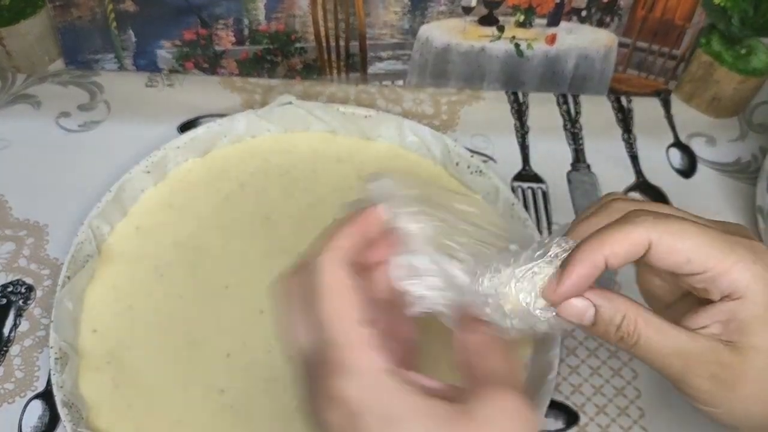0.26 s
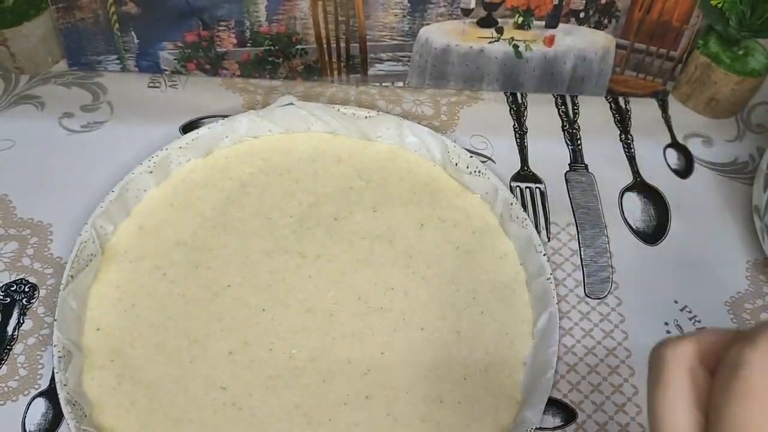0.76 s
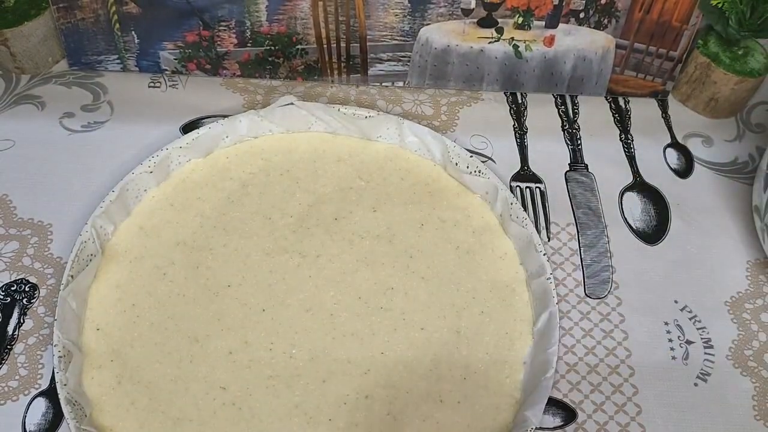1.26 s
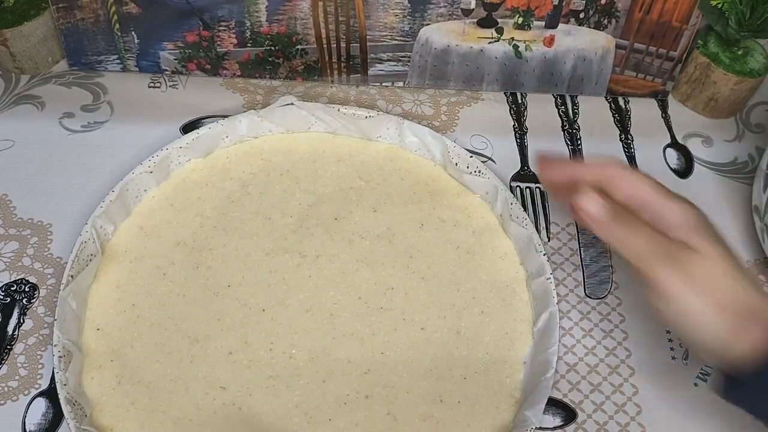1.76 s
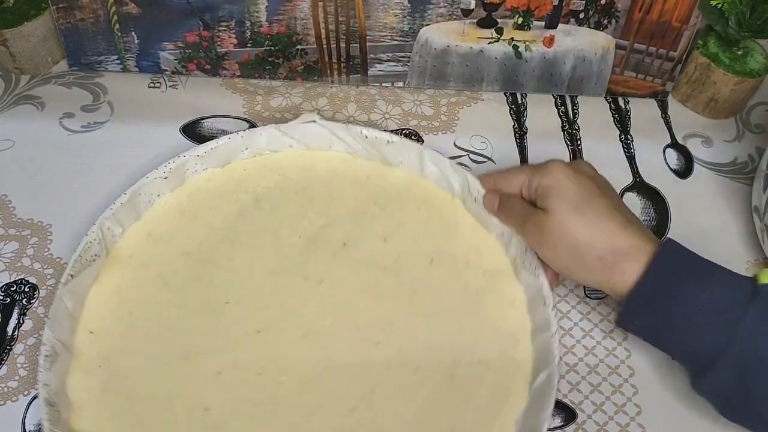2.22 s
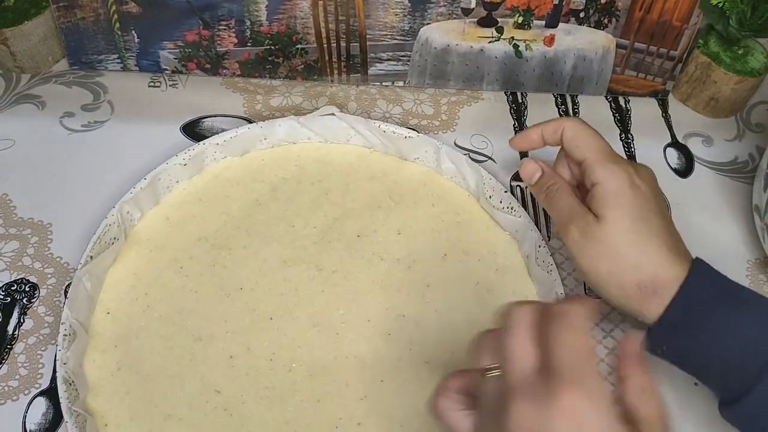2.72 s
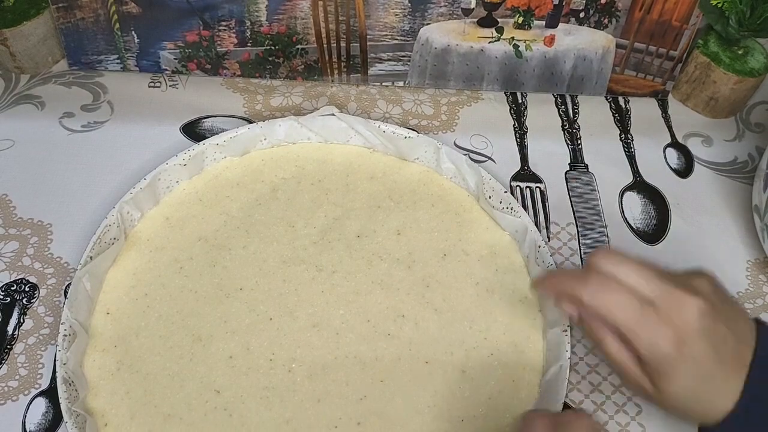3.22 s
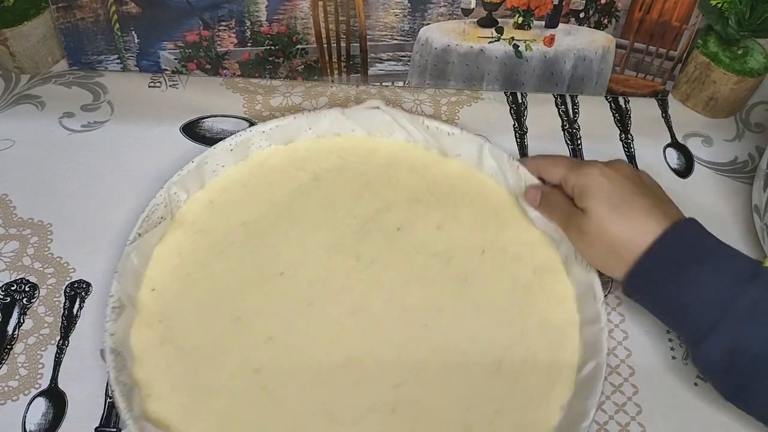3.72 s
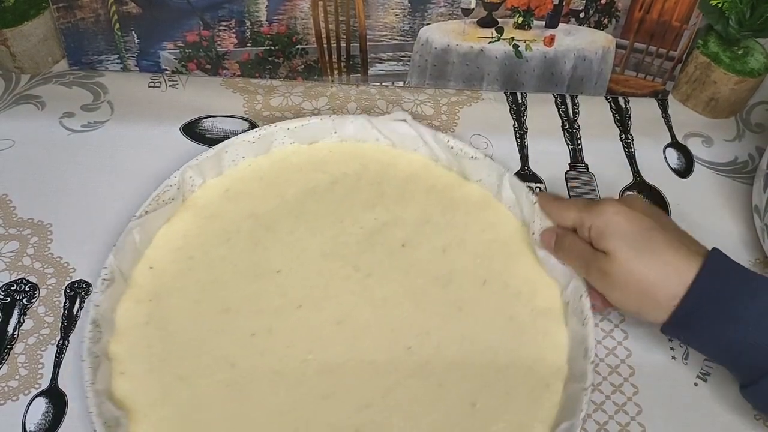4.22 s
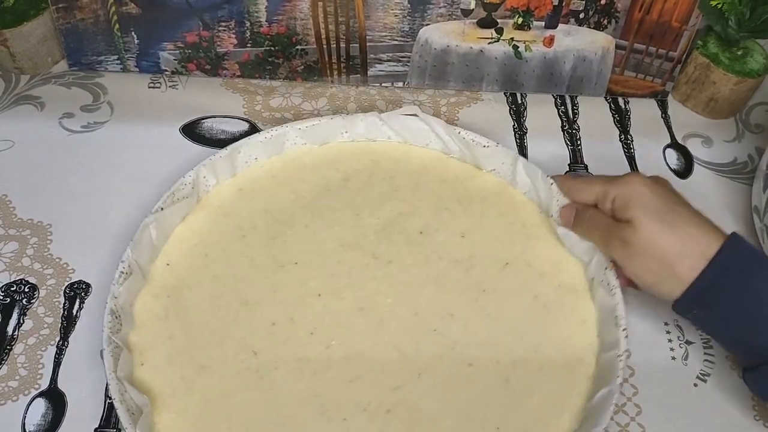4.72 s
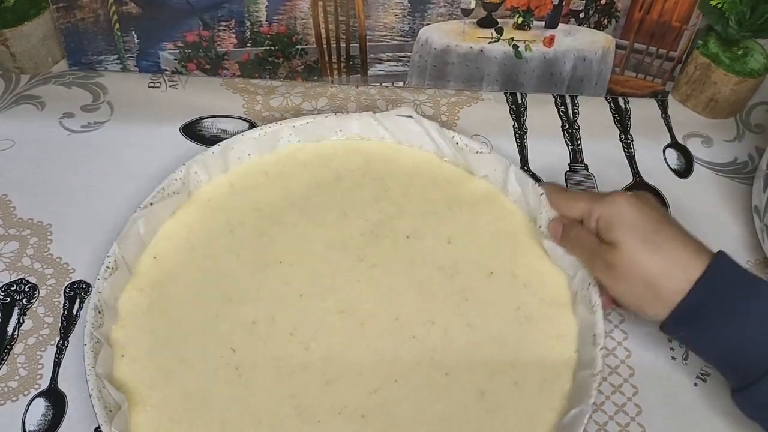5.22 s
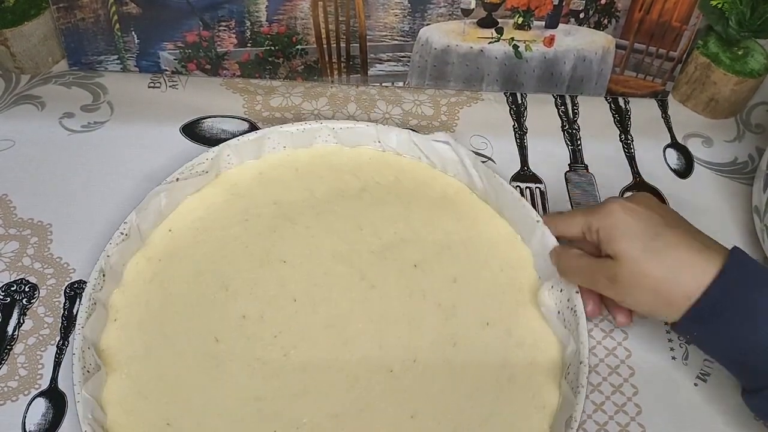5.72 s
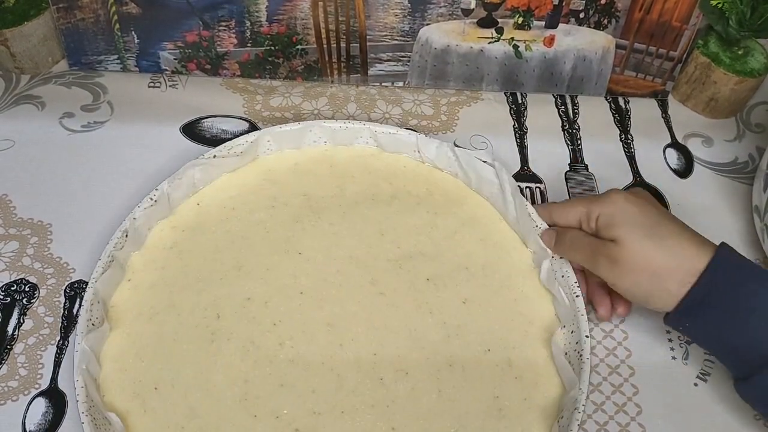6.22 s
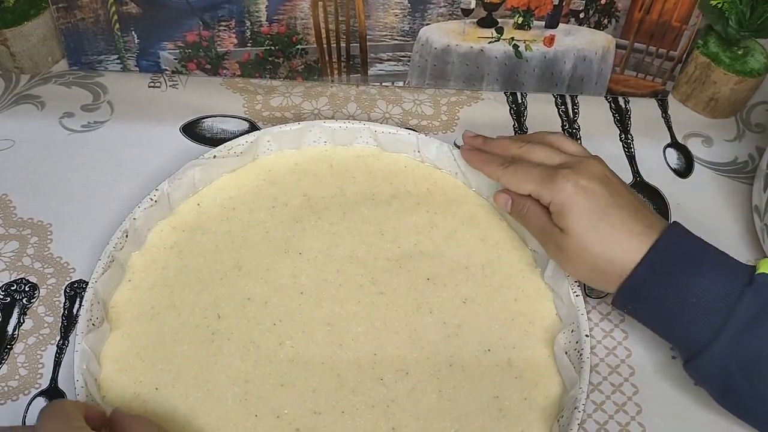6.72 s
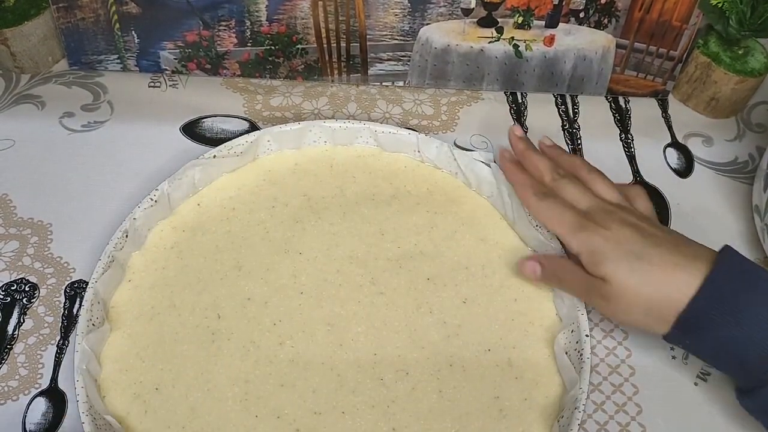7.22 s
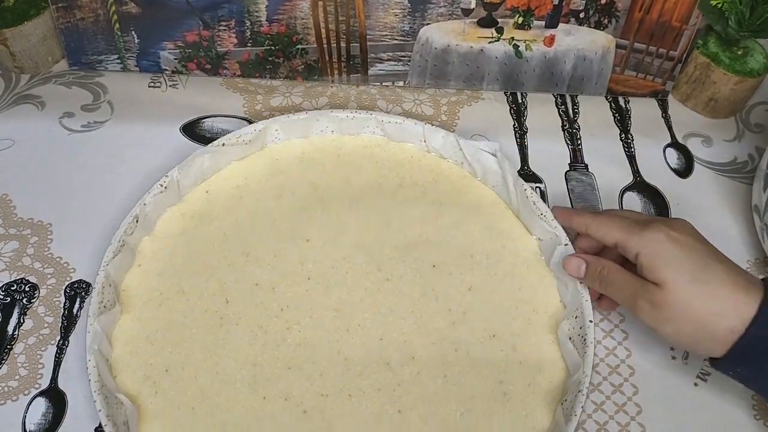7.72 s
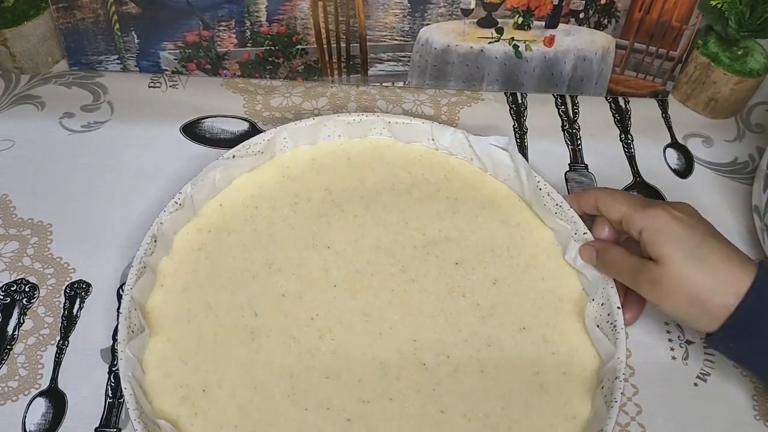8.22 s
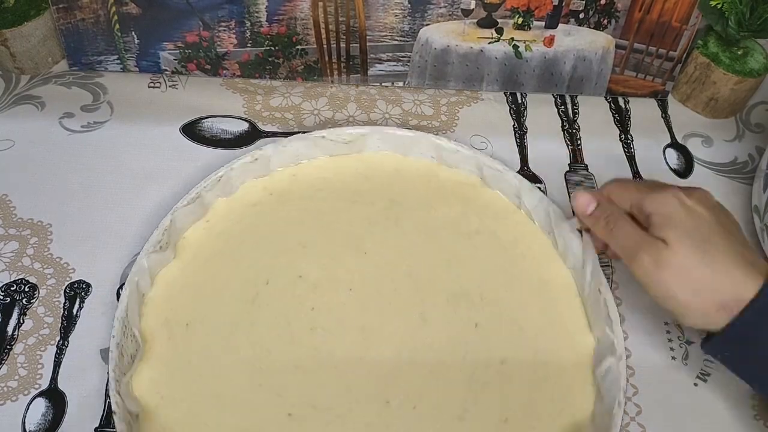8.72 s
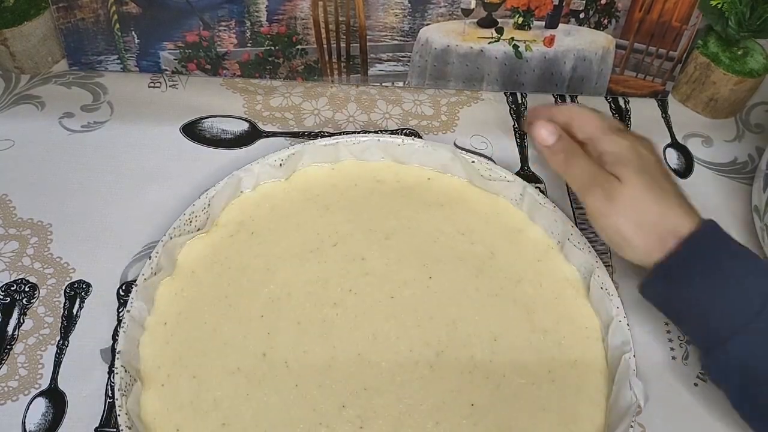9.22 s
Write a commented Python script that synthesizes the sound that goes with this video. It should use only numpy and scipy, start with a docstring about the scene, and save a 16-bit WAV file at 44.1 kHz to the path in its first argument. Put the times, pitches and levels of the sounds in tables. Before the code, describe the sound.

Close stereo in a small, slightly live kitchen with a faint low appliance hum. A thin plastic glove crackles densely for half a second, thins out and stops. Then fingers rub stiff parchment, and a dough-filled metal tray shifts softly over the tablecloth, with sharp paper snaps and several short, damped knocks, strongest around the middle.

```python
"""A small kitchen, heard close over a covered table with a stereo pair; an appliance hums in the room.
A thin plastic glove is pulled off and crumpled: its film is dense filtered clicks, pops and cracks.
Then a round metal tray, lined with parchment and damped by dough, is turned by hand: clicks and struck modes
make its knocks on the table, filtered clicks its soft slide, and the paper rustles and snaps above it."""
import sys
import numpy as np
from scipy import signal
from scipy.fft import rfft, irfft
from scipy.io import wavfile

SR = 44100
rng = np.random.default_rng(int(sys.argv[2]) if len(sys.argv) > 2 else 0)


def waveform_to_disk(signal):
    """Save audio, clipped to [-1, 1], as 16-bit WAV at the path in sys.argv[1]."""
    frames = np.transpose(np.atleast_2d(signal))
    scaled = np.clip(frames, -1, 1) * 32767
    samples = np.round(scaled).astype(np.int16)
    wavfile.write(sys.argv[1], SR, samples)


N = 417186
TIME = np.arange(N) / SR


def from_db(db):
    """Decibels to gain."""
    return 10 ** (np.asarray(db) / 20)


def rms_one(x):
    """Scale to unit power."""
    return x / np.sqrt(np.mean(x ** 2) + 1e-20)


def at_level(x, db, span_s):
    """Give the start of a sound this rms level."""
    start = x[:round(span_s * SR)]
    return from_db(db) * x / np.sqrt(np.mean(start ** 2))


def level(curve):
    """Gain over time from (t/s, level/dB) rows, -120 dB outside them."""
    return from_db(np.interp(TIME, *np.transpose(curve), left=-120, right=-120))


def at_hz(points, hz):
    """Read a table on a log-frequency axis."""
    f, value = np.transpose(points)
    return np.interp(np.log(np.maximum(hz, 1)), np.log(f), value)


def butter(x, hz, kind, order=2):
    """Causal Butterworth filter."""
    sections = signal.butter(order, np.minimum(hz, SR / 2 - 1), kind, fs=SR, output="sos")
    return signal.sosfilt(sections, x)


def coloured(x, spectrum, size=2048):
    """Filter by the causal, unit-energy response with this spectral shape (minimum phase, by cepstrum)."""
    gain = from_db(at_hz(spectrum, np.fft.rfftfreq(size, 1 / SR)))
    cepstrum = irfft(np.log(gain))
    cepstrum[1:size // 2] *= 2
    cepstrum[size // 2 + 1:] = 0
    response = irfft(np.exp(rfft(cepstrum)))
    response /= np.linalg.norm(response)
    return np.apply_along_axis(lambda row: signal.oaconvolve(row, response)[:len(row)], -1, x)


def drift(rate):
    """Slow chance with an rms of one; rate is in random knots per second."""
    knots = rng.standard_normal(4096)
    return rms_one(np.interp(TIME * rate, np.arange(len(knots)), knots))


def add(track, s, sound):
    """Mix a sound in at a time."""
    start = max(round(s * SR), 0)
    track[..., start:start + sound.shape[-1]] += sound[..., :N - start]


def spread(x, left_db):
    """Place a sound between left and right."""
    return x * from_db([[left_db / 2], [-left_db / 2]])


# decay of the room: f/Hz, t60/s
ROOM_DECAY = [(100, 0.46), (500, 0.23), (1000, 0.39), (2200, 0.17), (4000, 0.13), (8000, 0.089),
              (16000, 0.14)]
ROOM_ALIKE_HZ = 300  # well below this both microphones hear the same tail


def kitchen(x, wet_db, early_db, early_t60):
    """Direct sound, scatter from the sides of the table, and the room's tail, band by band."""
    t = TIME[:SR // 2]
    edges = np.geomspace(60, 20000, 10)
    response = np.zeros((2, len(t)))
    early = from_db(-60 * t / early_t60) * (t > .0005)
    early *= from_db(early_db) / np.linalg.norm(early)
    for low, high in zip(edges, edges[1:]):
        hz = np.sqrt(low * high)
        mid, side, scatter = butter(rng.standard_normal((3, len(t))), [low, high], "band")
        alike = 1 / (1 + (hz / ROOM_ALIKE_HZ) ** 2)
        tail = from_db(-60 * t / at_hz(ROOM_DECAY, hz)) * (t > .007)
        tail *= from_db(wet_db) / np.linalg.norm(tail)
        shared = np.sqrt(1 + alike) * mid * tail
        opposed = np.sqrt(1 - alike) * (side * tail + scatter * early)
        response += (shared + opposed * [[1], [-1]]) / np.sqrt(2)
    return x + signal.oaconvolve(np.atleast_2d(x), response, axes=1)[:, :N]


# low drone before its trim and waver: t/s, level/dB
DRONE_LEVEL = [(0.0, -77), (0.45, -56), (1.6, -65), (2.32, -41.5), (2.55, -57), (2.71, -47.5), (4.9, -51.5),
               (6.14, -45), (6.24, -52), (6.58, -40.5), (6.82, -50), (7.27, -53), (7.43, -47),
               (7.56, -54.5), (8.59, -52.5), (9.46, -55)]
DRONE_HZ, DRONE_TRIM_DB, DRONE_WAVER_DB = 47.2, -3, 3
# faint overtones of the drone, before their waver: f/Hz, rms level/dB
OVERTONES = [(183.0, -67), (369.5, -64), (395.0, -71.5), (500.6, -71.5), (561.5, -68)]
OVERTONE_WAVER_DB, OVERTONE_WANDER_RAD = 2.5, 1.01
# spectral shape of the still air: f/Hz, relative level/dB
AIR_SHAPE = [(20, 2), (35, -5.5), (60, -1.5), (90, -5), (165, 2), (235, -3), (290, 0), (380, -2.5),
             (520, -2), (700, -6), (1000, -13), (2000, -15), (4000, -19), (5500, -23), (8500, -42.5),
             (16000, -52)]
AIR_DB = -57.5


def background():
    """A wavering low drone with faint overtones (wandering sines), over the still air of the room (noise)."""
    drone_gain = from_db(DRONE_TRIM_DB + DRONE_WAVER_DB * drift(12)) * level(DRONE_LEVEL)
    drone = drone_gain * np.sin(2 * np.pi * DRONE_HZ * TIME + 0.32 * drift(3.6))
    hum = np.zeros(N)
    for hz, db in OVERTONES:
        gain = from_db(db + OVERTONE_WAVER_DB * drift(9))
        hum += gain * np.sin(2 * np.pi * hz * TIME + OVERTONE_WANDER_RAD * drift(10))
    mid, side = (coloured(noise, AIR_SHAPE, size=8192) for noise in rng.standard_normal((2, N)))
    air = mid + from_db(2.5) * butter(side, 470, "high", order=1) * [[1], [-1]]
    tones = drone * from_db([[-1.1], [1.1]]) + hum
    return np.sqrt(2) * tones + from_db(AIR_DB) * air  # sqrt(2): sine rms to peak


def swell(start_s, hold_s, db, rise_s, fall_s):
    """Attack, hold and release; rise and fall are the times for 20 dB."""
    before = np.maximum(start_s - TIME, 0) / max(rise_s, 1e-3)
    after = np.maximum(TIME - start_s - hold_s, 0) / max(fall_s, 1e-3)
    return from_db(db - 20 * np.minimum(before + after, 6))


def together(swells):
    """Overlapping movements add in power."""
    return np.sqrt(sum(gain ** 2 for gain in swells))


def strokes(rows):
    """Each stroke gathers up to its peak and eases off."""
    return together(swell(s, 0, db, rise_s, fall_s) for s, db, rise_s, fall_s in rows)


def crinkles(per_s, spread_db, clump_db, clump_rate):
    """Tiny buckles or slips: clicks of uneven size that come in clumps, each from its own place."""
    at = rng.integers(0, N, int(per_s * N / SR))
    knots = rng.standard_normal(4096)
    clumps = np.interp(at / SR * clump_rate, np.arange(len(knots)), knots)
    uneven = np.minimum(rng.exponential(1, len(at)), 4)
    sizes = from_db(spread_db * uneven + clump_db * clumps) * rng.choice([-1, 1], len(at))
    # each click reaches the two microphones at slightly different times
    lag = np.rint(rng.normal(0, 1.6, len(at))).astype(int)
    out = np.zeros((2, N))
    out[0, at] = sizes
    out[1, (at + lag) % N] = sizes
    return rms_one(out)


REFOLD_DB, REFOLD_PER_S = 2.5, 14  # the colour of a sheet shifts as it folds anew


def sheet(per_s, spread_db, clump_db, clump_rate, jerk_db):
    """Facets of eight sizes buckle independently, so the colour shifts; small ones sound high."""
    edges = np.array([300, 1300, 2100, 2900, 3700, 4600, 5800, 8500, 17000])
    shares = np.diff(edges) / np.ptp(edges)  # wider bands get more clicks
    facets = np.zeros((2, N))
    for low, high, share in zip(edges, edges[1:], shares):
        buckles = crinkles(per_s * share, spread_db, clump_db, clump_rate)
        facets += butter(buckles, [low, high], "band") * from_db(REFOLD_DB * drift(REFOLD_PER_S))
    # the fingers catch and let go, which jerks all facets at once
    return facets * from_db(jerk_db * drift(70))


def pops(per_s, low_hz, high_hz, cycles):
    """Larger creases pop at random, each ringing briefly (60 dB in so many cycles) at its own pitch."""
    out, t = np.zeros((2, N)), TIME[:1024]
    for when, size, pitch, side in rng.random((int(per_s * N / SR), 4)):
        hz = low_hz * (high_hz / low_hz) ** pitch
        pop = from_db(14 * size - 60 * t * hz / cycles) * np.sin(2 * np.pi * hz * t)
        add(out, when * N / SR, spread(pop, 12 * (side - .5)))
    return rms_one(out)


SQUEEZE_ATTACK_S, SQUEEZE_RELEASE_S = 0.04, 0.076  # time to rise or fall by 20 dB


def squeezing(grips):
    """The hands grip the film, keep up the pressure and let go."""
    return together(swell(s, hold_s, db, SQUEEZE_ATTACK_S, SQUEEZE_RELEASE_S) for s, hold_s, db in grips)


# spectral shape of the film: f/Hz, relative level/dB
FILM_SHAPE = [(350, -22), (600, -17.5), (957, -16.5), (1040, -13.5), (1410, -16.5), (1660, -13),
              (2950, -9.5), (3340, -9.5), (4650, -6.5), (5560, -7), (8860, -19), (14300, -18), (16000, -28)]
# pulls and squeezes, before the glove's trim: start t/s, hold/s, fine film level/dB, coarse folds level/dB
GLOVE_SQUEEZES = [(0.0, 0.056, -38, -44), (0.083, 0.042, -37.5, -56), (0.156, 0.079, -39.5, -48),
                  (0.243, 0.072, -37, -44.5), (0.342, 0.04, -38, -47), (0.412, 0.025, -45, -58),
                  (0.439, 0.01, -36, -53), (0.589, 0.027, -37, -44), (0.632, 0.077, -39.5, -63),
                  (0.831, 0.1, -48, -58), (0.973, 0.04, -48, -54), (1.203, 0.042, -52.5, -70),
                  (1.33, 0.092, -43, -49)]
STIR_HOLD_S, STIR_DB = 1.55, -61  # the film keeps stirring in the hand between squeezes
# faint squeak of the film: t/s, level/dB
SQUEAK_LEVEL = [(1.08, -84), (1.11, -60), (1.16, -56), (1.19, -78)]
SQUEAK_HZ, GLOVE_TRIM_DB = 3323, -5.0  # the trim leaves the squeak alone


def glove():
    """Limp film buckles densely, with small pops, coarser folds and one squeak (a trembling sine)."""
    film = sheet(per_s=24000, spread_db=2.6, clump_db=2.2, clump_rate=50, jerk_db=1)
    film = coloured(film, FILM_SHAPE)
    film = film + from_db(-2) * pops(per_s=320, low_hz=3300, high_hz=5700, cycles=30)
    folds = pops(per_s=600, low_hz=1900, high_hz=4200, cycles=14)
    stir = (0.0018, STIR_HOLD_S, STIR_DB)
    fine = squeezing([stir] + [(s, hold_s, db) for s, hold_s, db, _ in GLOVE_SQUEEZES])
    coarse = squeezing([(s, hold_s, db) for s, hold_s, _, db in GLOVE_SQUEEZES])
    squeak = level(SQUEAK_LEVEL) * np.sin(2 * np.pi * SQUEAK_HZ * TIME + 1.1 * drift(120))
    return from_db(GLOVE_TRIM_DB) * (fine * film + coarse * folds) + squeak


# finger strokes on the paper, before the parchment's trim: peak t/s, level/dB, rise/s and fall/s per 20 dB
FINGER_RUBS = [(1.86, -52, 0.17, 0.55), (2.012, -40.5, 0.12, 0.093), (2.1, -47, 0.069, 0.056),
               (2.215, -42.5, 0.082, 0.041), (2.36, -46.5, 0.88, 0.37), (3.1, -54.5, 0.52, 0.3),
               (3.61, -46.5, 0.3, 0.25), (3.722, -43, 0.049, 0.036), (3.82, -43.5, 0.13, 0.044),
               (4.79, -48, 0.045, 0.2), (4.02, -42.5, 0.21, 0.34), (4.29, -47, 0.15, 0.08),
               (4.945, -47.5, 0.025, 0.079), (5.015, -45, 0.066, 0.049), (5.125, -45, 0.053, 0.13),
               (5.27, -43, 0.034, 0.034), (6.58, -55, 0.26, 0.12), (6.78, -48, 0.096, 0.026),
               (6.99, -44, 0.26, 0.077), (7.25, -41.5, 0.049, 0.038), (7.45, -48.5, 0.095, 0.043),
               (7.82, -51, 0.38, 0.11), (8.06, -49.5, 0.27, 1), (8.39, -35, 0.045, 0.051),
               (8.71, -39, 0.22, 0.19), (8.91, -43.5, 0.027, 0.036), (9.08, -37, 0.18, 0.1),
               (9.44, -38.5, 0.24, .2)]
SETTLE_RISE_S, SETTLE_FALL_S, SETTLE_LAG_S = .012, 0.15, 0.0043  # the sheet rustles on after each snap


def paper_motion():
    """The paper moves under the fingers, and settles after every parchment snap."""
    settling = [(s + SETTLE_LAG_S, rustle_db, SETTLE_RISE_S, SETTLE_FALL_S)
                for s, *_, rustle_db in PARCHMENT_SNAPS]
    return strokes(FINGER_RUBS + settling)


# spectral shape of the rubbed paper: f/Hz, relative level/dB
PAPER_SHAPE = [(290, -45), (500, -18.5), (831, -10), (1140, -8), (1280, -15.5), (1900, -8), (2930, -5.5),
               (3150, -6), (5310, -4), (8210, -20.5), (10700, -19), (14200, -25.5), (16000, -30)]
PAPER_TRIM_DB = -4.5


def parchment():
    """Stiff paper rubs and pops under the fingers, coarser than the film."""
    rub = sheet(per_s=18000, spread_db=3, clump_db=3.5, clump_rate=35, jerk_db=1.5)
    rub = coloured(rub, PAPER_SHAPE)
    rub = rub + from_db(-5.5) * pops(per_s=260, low_hz=1700, high_hz=6300, cycles=36)
    return from_db(PAPER_TRIM_DB) * paper_motion() * rub


# parchment creases snapping over: t/s, level/dB, pitch f/Hz, hollow body/dB,
# level/dB of the rustle that follows (before the parchment's trim)
PARCHMENT_SNAPS = [(1.692, -48.5, 3150, 21, -56), (1.997, -36.5, 1880, 2, -58), (2.018, -42, 5460, 5, -47),
                   (2.209, -38, 3030, 4, -50), (2.398, -43.5, 2990, 2, -45), (3.203, -40, 3810, 9, -61),
                   (3.4453, -20.5, 3950, -2, -45), (3.4497, -33, 2070, 3, -46), (3.463, -38, 4000, 6, -52),
                   (3.485, -42, 4860, -2, -51), (3.498, -39, 3300, 2, -57), (3.527, -49, 2190, 4, -60),
                   (3.798, -43, 4900, 14, -42.5), (3.822, -48, 4270, -9, -53), (3.929, -38, 3500, 10, -43),
                   (4.411, -37.5, 5160, -3, -45.5), (4.435, -48, 5300, -8, -54),
                   (4.609, -34.5, 3270, 17, -43.5), (4.627, -36, 4700, 8, -65), (4.636, -29, 4700, 10, -64),
                   (4.6536, -33, 5300, 15, -64), (5.1788, -38.5, 5750, -13, -42.5),
                   (5.301, -32, 4700, 17, -53), (5.322, -37.5, 4870, 3, -64), (5.575, -35.5, 5100, -8, -48),
                   (5.619, -28.5, 4640, -7, -36), (5.64, -27.5, 5370, 1.5, -38.5),
                   (5.783, -35.5, 3940, -19, -41.5), (5.8889, -30, 4960, 10, -44),
                   (5.941, -37, 3970, 14, -44), (5.952, -26.5, 4540, -3, -35), (6.109, -35, 4040, 5, -41.5),
                   (6.27, -45, 5070, 3, -60.5), (6.544, -43.5, 5760, 10, -53.5), (6.569, -48, 2800, 9, -73),
                   (6.602, -44.5, 2550, 4, -63), (6.614, -40, 5060, 6, -50), (6.695, -52, 3670, 17, -49.5),
                   (6.747, -50, 2850, 9, -66), (6.773, -43.5, 3300, 3, -75), (6.9127, -40, 5640, 8.5, -64),
                   (6.94, -45, 5200, 30, -60), (6.945, -34.5, 3800, 6, -58), (6.9521, -28.5, 5050, 3, -56),
                   (6.996, -38, 5100, 5, -45), (7.038, -39, 2400, 13, -71), (7.09, -43.5, 5140, -3.5, -69),
                   (7.18, -51, 4760, -4, -66), (7.262, -45.5, 2860, 4, -55), (7.598, -46, 4200, 5, -47),
                   (7.822, -44.5, 3460, 2, -55), (7.9534, -35, 5240, -2, -61), (8.779, -38, 4370, 20, -62),
                   (8.964, -35.5, 4720, 3.5, -46), (9.001, -27, 3400, -11, -46),
                   (9.375, -26.5, 3100, -26, -37)]
# larger folds of the glove that crack: t/s, level/dB, pitch f/Hz
GLOVE_FOLD_CRACKS = [(0.036, -48, 4800), (0.08, -45, 5160), (0.1117, -44, 4870), (0.186, -41, 5200),
                     (0.219, -44, 4480), (0.292, -46, 4150), (0.334, -42, 3350), (0.346, -45, 4470),
                     (0.406, -38.5, 4260), (0.4475, -36, 4700), (0.456, -34.5, 4120), (0.583, -53, 3240),
                     (0.612, -40, 2620), (0.628, -42, 3700), (0.702, -44, 4900), (0.844, -50, 5450),
                     (0.912, -48.5, 4970)]
GLOVE_BODY_DB = -5


def creases():
    """Creases of the parchment and of the glove: t/s, level/dB, pitch f/Hz, hollow body/dB."""
    paper = [row[:-1] for row in PARCHMENT_SNAPS]
    return paper + [(s, db, hz, GLOVE_BODY_DB) for s, db, hz in GLOVE_FOLD_CRACKS]


def burst(t, scatter_db, t60):
    """One contact click and the smaller ones that die away after it."""
    clicks = rng.standard_normal(len(t)) * from_db(scatter_db) * from_db(-60 * t / t60)
    clicks[0] = 1
    return clicks


FACET_T60_S, FACET_LOSS_DB = 0.047, 8  # each further ring is weaker by the loss
FACET_SPREAD_OCTAVES = 0.51  # scales a random -1.5 to 1


def facet_ring(t, hz, count=4):
    """The facet that flipped rings at its pitch, with weaker rings at random pitches around it."""
    octaves = np.r_[0, FACET_SPREAD_OCTAVES * rng.uniform(-1.5, 1, count - 1)]
    out = np.zeros(len(t))
    for k, f in enumerate(hz * 2 ** octaves):
        out += from_db(-FACET_LOSS_DB * k - 60 * t / FACET_T60_S) * np.sin(2 * np.pi * f * t)
    return out


SIZZLE_DB, SIZZLE_AT_HZ, SIZZLE_DB_PER_OCTAVE = -15, 4440, 12  # tighter creases have more top
FACET_RING_DB = -4


def snaps(tone_db=2, strain_db=-25, strain_t60=0.031, scatter_db=-11, flip_t60=0.023):
    """A crease strains, flips over in a few milliseconds, and the sheet around it rings briefly."""
    out, t = np.zeros(N), TIME[:2048]
    for s, db, hz, body_db in creases():
        sizzle_db = SIZZLE_DB + SIZZLE_DB_PER_OCTAVE * np.log2(hz / SIZZLE_AT_HZ)
        # the strain grows towards the flip
        strain = rng.standard_normal(len(t)) * from_db(strain_db) * from_db(-60 * t[::-1] / strain_t60)
        flip = burst(t, scatter_db, flip_t60)
        colour = [(300, body_db - 10), (1000, body_db - 10), (1900, body_db + 0.5), (3000, -0.61),
                  (6700, -3), (8200, sizzle_db), (16000, sizzle_db - 0.5)]
        snap = coloured(np.r_[strain, flip], colour, size=1024)
        snap = snap + from_db(tone_db) * butter(snap, [hz * .85, hz / .85], "band", order=1)
        facets = np.r_[np.zeros(len(t)), facet_ring(t, hz)]
        snap = rms_one(snap) + from_db(FACET_RING_DB) * rms_one(facets)
        # the level is that of the whole energy packed into 6 ms
        snap = from_db(db) * snap / np.sqrt(np.sum(snap ** 2) / (.006 * SR))
        add(out, s - len(t) / SR, snap)
    return out


# pushes over the tablecloth, before the slide's trim: peak t/s, level/dB, rise/s and fall/s per 20 dB
TRAY_PUSHES = [(2.22, -42, 0.23, 0.16), (2.35, -43.5, 0.27, 0.27), (3.53, -52, 0.14, 0.13),
               (3.88, -45, 0.23, 0.66), (4.15, -45, 0.22, 0.39), (4.62, -41, 0.068, 0.49),
               (4.96, -47, 0.2, 0.24), (5.2, -43.5, 0.37, 0.13), (5.7, -44.5, 0.15, 0.22),
               (5.98, -49.5, 0.19, 0.42), (7.72, -53, 0.4, 0.48), (8.66, -44.5, 0.15, .2),
               (9.02, -41.5, 0.12, 0.14), (9.46, -44, 0.28, .2)]
# spectral shape of the dragging base: f/Hz, relative level/dB
SLIDE_SHAPE = [(50, -33), (100, -1), (170, 3.5), (250, 1.5), (380, 4.5), (750, -2), (1300, -7.5),
               (3000, -48.5)]
SLIDE_TRIM_DB = -3.5


def slide():
    """The tray's base drags softly and evenly over the tablecloth, in many tiny slips."""
    slips = crinkles(per_s=3500, spread_db=1.5, clump_db=2, clump_rate=42)
    return from_db(SLIDE_TRIM_DB) * strokes(TRAY_PUSHES) * coloured(slips, SLIDE_SHAPE)


GRIP_DETUNE = 0.012  # the grip and the point of contact shift the modes from blow to blow


def ring(modes, t, spread_db):
    """Struck modes; each blow shares its force out and tunes them a little differently."""
    hz, db, t60 = np.transpose(modes)[:, :, None]
    db = db + spread_db * rng.standard_normal(hz.shape)
    hz = hz * (1 + GRIP_DETUNE * rng.standard_normal(hz.shape))
    return np.sum(from_db(db - 60 * t / t60) * np.cos(2 * np.pi * hz * t), axis=0)


# tray knocks, before the settings of knocks(): t/s, tray level/dB, contact brightness f/Hz,
# table thud level/dB, thud pitch f/Hz, free ringing/dB, left minus right/dB, chatter t60/s
TRAY_KNOCKS = [(2.444, -38.5, 810, -41, 130, -13, 6, 0.11), (2.51, -46.5, 2530, -63, 205, -27, -1, 0.096),
               (2.691, -47.5, 2100, -44.5, 250, -22, 4, 0.064), (2.709, -54, 700, -40.5, 169, -8, -2, 0.28),
               (2.76, -57, 882, -49, 130, -2, -3, 0.39), (3.204, -43.5, 2440, -66, 248, -16, -4, 0.061),
               (3.725, -57, 870, -46.5, 130, 1, 2, 0.061), (3.879, -41, 780, -53, 170, 1, 0, 0.16),
               (3.975, -30.5, 1030, -27, 116, -21, -2, 0.08), (4.002, -29.5, 880, -42, 171, -25, 4, 0.054),
               (4.13, -38.5, 1720, -68, 200, -2, 0, 0.43), (4.163, -34, 1320, -31.5, 167, -15, 0, 0.054),
               (4.186, -39.5, 920, -40, 220, -9, 3, 0.098), (4.4047, -17, 1550, -33, 131, -3, -1.5, 0.042),
               (4.4287, -15.5, 1350, -29, 130, -16.5, 1.5, 0.088),
               (4.6114, -30, 2880, -50, 130, -3, -2, 0.09), (4.618, -20.5, 2200, -30.5, 81, 11, 5, 0.037),
               (4.633, -20, 1260, -29, 79.5, -9, -1.5, 0.1), (4.644, -30, 2440, -56, 99.8, 0, 2, 0.12),
               (4.998, -39, 1230, -44, 169, -3, 5, 0.1), (5.178, -12, 3600, -33.5, 108, 9, -1.5, 0.034),
               (5.19, -28.5, 2900, -65, 200, -4.5, 3, 0.41), (5.274, -34, 1040, -37.5, 260, -3, 12, 0.38),
               (5.289, -34, 1100, -39.5, 200, 0, 4, 0.13), (5.301, -34, 2170, -43, 240, -7, 0, 0.026),
               (5.32, -20.5, 1210, -30, 113, -26, -1, 0.11), (6.113, -42, 2410, -53, 131, 10, 4, 0.074),
               (8.14, -34.5, 975, -28, 200, -5, 5.5, 0.094), (8.149, -22, 1620, -25.5, 343, -35, 1, 0.02),
               (8.154, -24, 1100, -27, 174, -24, -1, 0.11), (8.168, -30, 1220, -41, 332, -25, 2, 0.11),
               (8.266, -41, 730, -37, 149, -22, 2, 0.22), (8.778, -36.5, 2800, -66, 130, -20, -12, 0.03),
               (9.249, -55, 800, -44, 139, -9, 6, 0.23)]
# the tray's crowd of short-lived modes: f/Hz, relative level/dB
CLACK_SHAPE = [(100, -29.5), (300, -16.5), (520, 1.5), (800, -1.5), (1250, 1.5), (1800, 1.5), (2500, 2.5),
               (3200, -2), (3650, -35), (8000, -52)]
# modes of the tray: f/Hz, relative level/dB, t60/s
TRAY_MODES = [(520, -0.5, 0.1), (640, -14, 0.09), (735, 11, 0.09), (771, 12.5, 0.095), (857, -12.5, 0.31),
              (1040, -20, 0.09), (1147, 10.5, 0.034), (1242, 9, 0.049), (1320, -5, 0.09),
              (1540, -12, 0.091), (1750, -20, 0.13), (1930, -9, 0.14), (2110, -12, 0.17),
              (2330, 5.5, 0.051)]
# modes of the table top: f/Hz, relative level/dB, t60/s
TABLE_MODES = [(84, -3.5, 0.19), (101.5, 0, 0.26), (152, -2, 0.085), (171, -2.5, 0.11), (294, -12, 0.11),
               (336.4, 5, 0.17), (465, 7.5, 0.086)]


def knocks(ring_db=-1, clack_db=-1.0, table_db=-2.0, hardness=0.8, bump_hz=380, thud_width=1.82):
    """The rim clacks, chatters and rings briefly under the dough; the table's thud varies with the spot."""
    out, t = np.zeros((2, N)), TIME[:SR // 4]
    for s, tray_db, bright_hz, thud_db, thud_hz, free_db, left_db, chatter_t60 in TRAY_KNOCKS:
        clack = coloured(burst(t, scatter_db=-23.5, t60=chatter_t60), CLACK_SHAPE)
        ringing = ring(TRAY_MODES, t, spread_db=2)
        tray = at_level(clack, 0, .014) + at_level(ringing, free_db + ring_db, .014)
        # a soft contact is dull
        tray = butter(tray, bright_hz * hardness, "low", order=4)
        tray = at_level(tray, tray_db + clack_db, .014)
        settling = butter(burst(t, scatter_db=-2.5, t60=1.6 * chatter_t60), [110, bump_hz], "band")
        thud = at_level(settling, -1, .03) + at_level(ring(TABLE_MODES, t, spread_db=2), 0, .03)
        thud = butter(thud, [70, 520], "band")
        thud = butter(thud, [thud_hz / thud_width, thud_hz * thud_width], "band", order=1)
        thud = at_level(thud, thud_db + table_db, .03)
        add(out, s, spread(tray, left_db) + thud)
    return out


def scene():
    """Every source sounds in the same small kitchen."""
    rustle = kitchen(glove() + parchment(), wet_db=-5, early_db=-4, early_t60=.015)
    clicks = kitchen(snaps(), wet_db=-6.5, early_db=3.0, early_t60=0.0078)
    tray = kitchen(knocks() + slide(), wet_db=-10.0, early_db=0.0, early_t60=0.011)
    return rustle + clicks + tray + background()


CUTOFF_HZ = 15600


def record(dry):
    """The highest peaks are rounded and the top is cut steeply."""
    rounded = dry / (1 + (dry / .95) ** 4) ** .25
    return signal.sosfilt(signal.ellip(10, .1, 80, CUTOFF_HZ, fs=SR, output="sos"), rounded)


dry = scene()
out = record(dry)
waveform_to_disk(out)
```